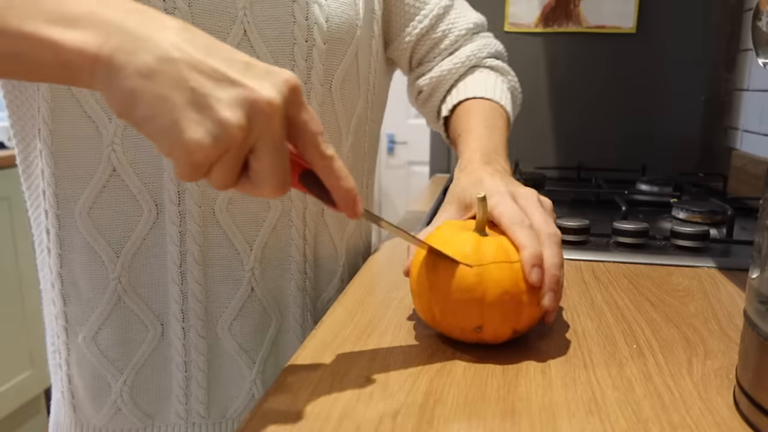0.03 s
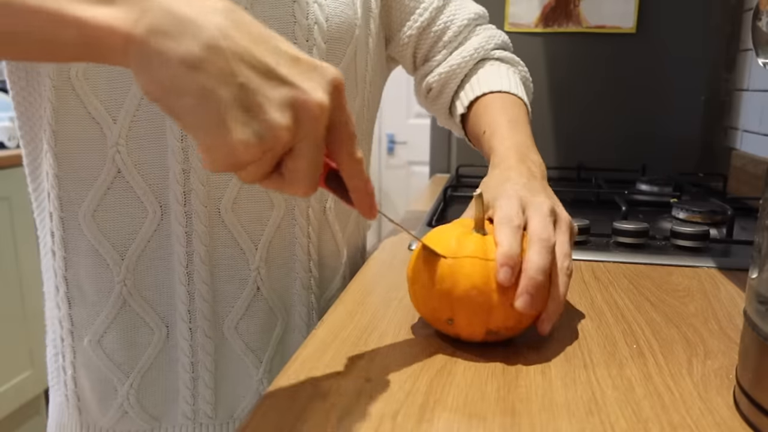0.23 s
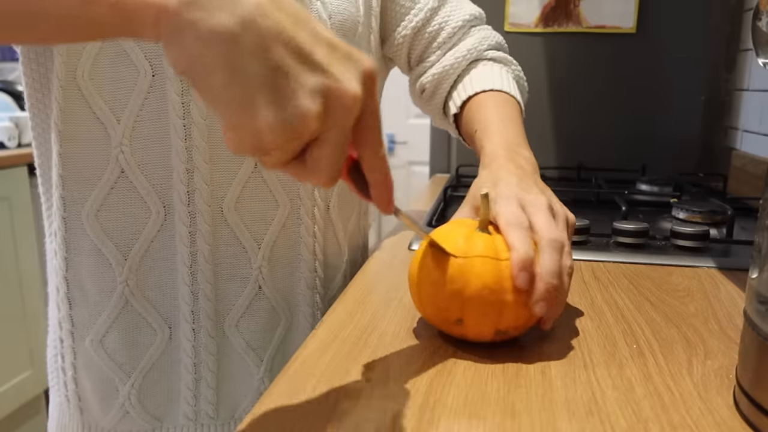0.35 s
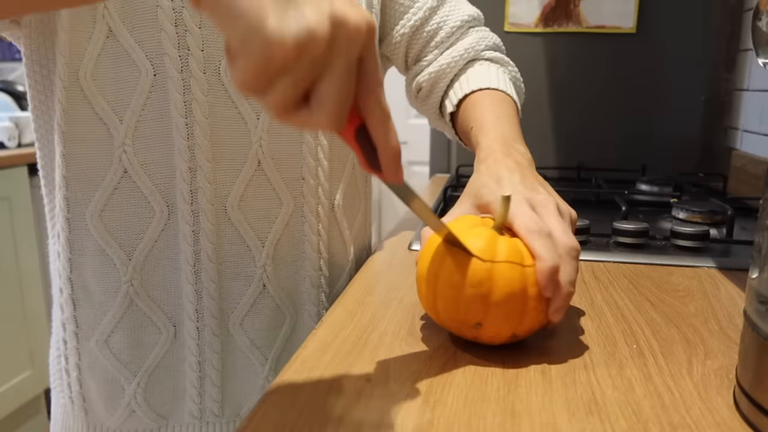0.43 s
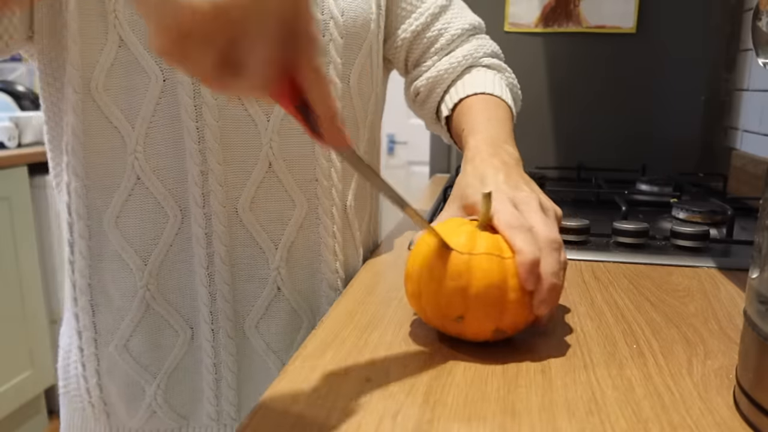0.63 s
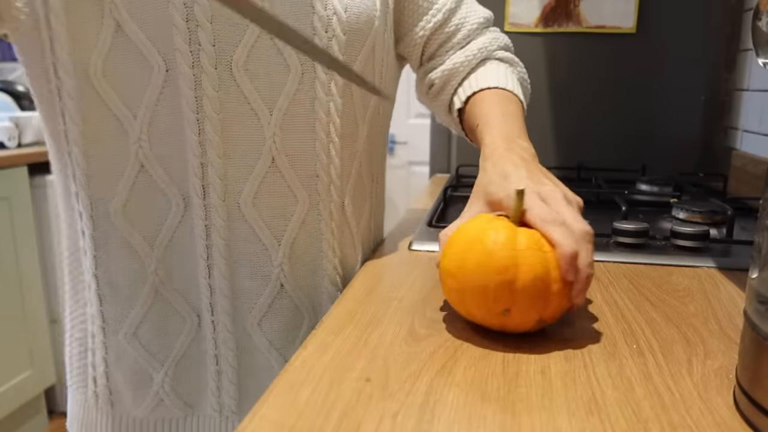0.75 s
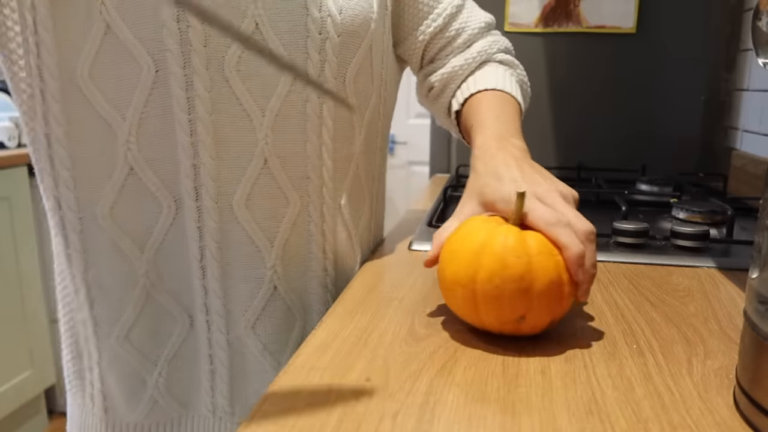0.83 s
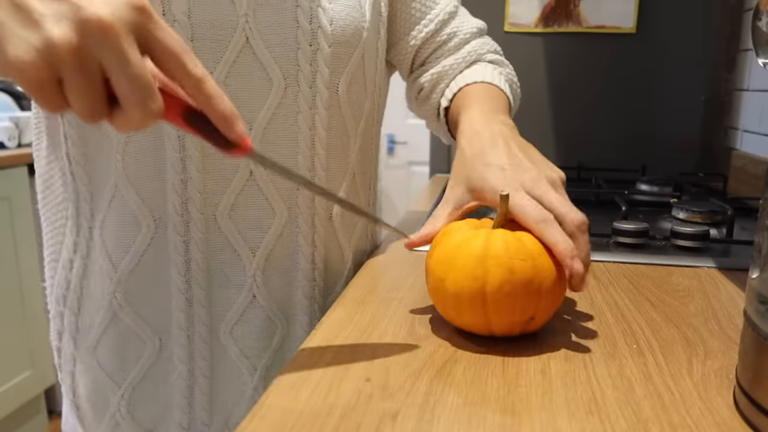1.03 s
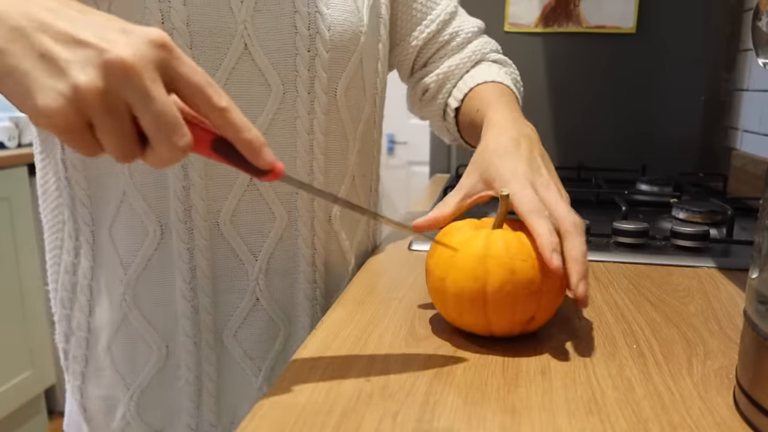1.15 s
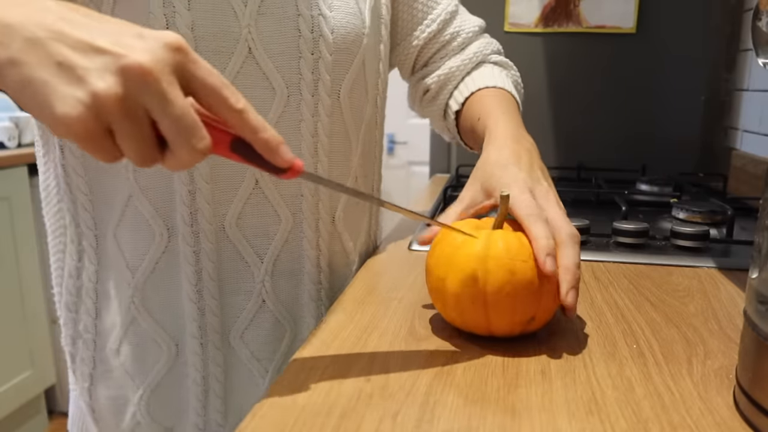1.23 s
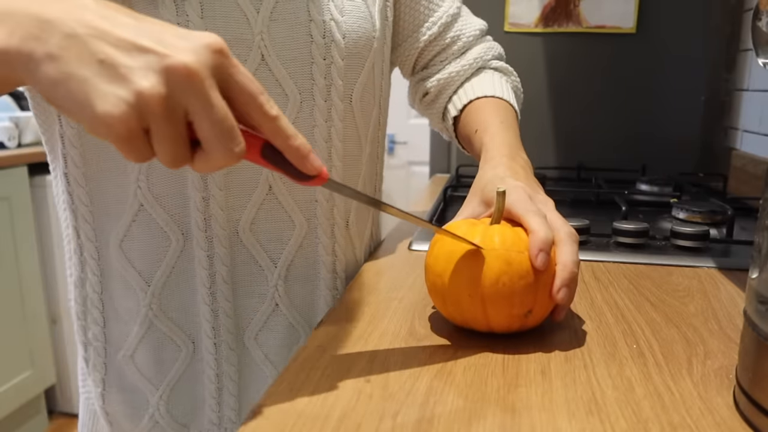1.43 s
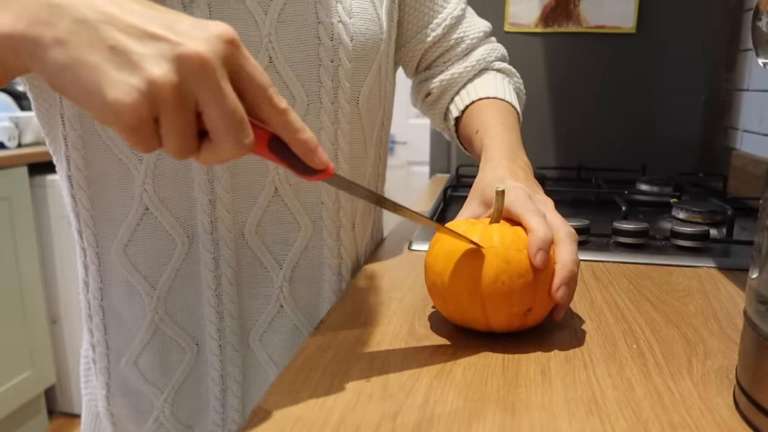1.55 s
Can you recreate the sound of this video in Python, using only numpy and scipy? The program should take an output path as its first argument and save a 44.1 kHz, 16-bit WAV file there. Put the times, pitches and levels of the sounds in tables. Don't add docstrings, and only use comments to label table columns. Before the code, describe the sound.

Knife cutting a small hard pumpkin: short rasp, dull heavy knocks on a worktop, low fridge hum

```python
import sys
import numpy as np
from scipy import signal
from scipy.fft import rfft, irfft, next_fast_len
from scipy.io import wavfile
from scipy.ndimage import map_coordinates

SR = 44100
rng = np.random.default_rng(int(sys.argv[2]) if len(sys.argv) > 2 else 0)


def generate_wav(signal):
    frames = np.transpose(np.atleast_2d(signal))
    scaled = np.clip(frames, -1, 1) * 32767
    pcm = np.round(scaled).astype(np.int16)
    wavfile.write(sys.argv[1], SR, pcm)


def convert_level_to_amplitude(level_db):
    exponent = np.asarray(level_db, float) / 20
    return 10 ** exponent


N = 70560
TIME_S = np.arange(N) / SR
OPPOSITE = np.array([[1], [-1]])


def unit(x):
    return x / np.sqrt(np.mean(x ** 2) + 1e-20)


def along(points, hz):
    f, v = np.transpose(points)
    return np.interp(np.log(hz + 1), np.log(f + 1), v)


def wobble(knots_per_s):
    knots = rng.standard_normal(int(N * knots_per_s / SR) + 4)
    return map_coordinates(knots, [np.arange(N) * knots_per_s / SR])


def filtered(x, response):
    m = next_fast_len(N + SR // 2)
    return irfft(rfft(x, m) * response(np.fft.rfftfreq(m, 1 / SR)), m)[..., :N]


def coloured(x, spectrum):
    low_hz = spectrum[0][0]
    return filtered(x, lambda hz: convert_level_to_amplitude(along(spectrum, hz)) * np.minimum(1, hz / low_hz) ** 4)


def add(track, s, sound):
    part = track[round(s * SR):][:len(sound)]
    part += sound[:len(part)]


def friction(stroke, colour, resonances):
    grains_per_s, spread_db = 2500, 5
    grains = (rng.random(N) < grains_per_s / SR) * convert_level_to_amplitude(spread_db * rng.uniform(-1.9, 1, N))
    grains = grains * np.sign(rng.standard_normal(N))
    rough = np.sqrt(0.5) * (unit(grains) + rng.standard_normal(N))

    def cut(hz):
        ring = 1
        for centre_hz, width_hz, db in resonances:
            damping = 1j * hz * width_hz
            ring = ring + convert_level_to_amplitude(db - 0.5) * damping / (centre_hz ** 2 - hz ** 2 + damping)
        return ring

    s, db = np.transpose(stroke)
    level_db = np.interp(TIME_S, s, db, left=-120, right=-120) + 0.52 * wobble(60)
    return convert_level_to_amplitude(level_db) * unit(coloured(filtered(rough, cut), colour))


def strike(modes, tilt_db, centre_hz, attack_s):
    t = np.arange(SR // 4) / SR
    ring = np.zeros(len(t))
    for hz, db, t60_s in modes:
        level_db = db + tilt_db * np.log2(hz / centre_hz) + rng.standard_normal()
        ring += convert_level_to_amplitude(level_db - 60 * t / t60_s) * np.sin(2 * np.pi * hz * t)
    return ring * (1 - np.exp(-t / attack_s))


def strikes(blows, modes, centre_hz, attack_s):
    out = np.zeros(N)
    for s, db, tilt_db in blows:
        add(out, s, convert_level_to_amplitude(db) * strike(modes, tilt_db, centre_hz, attack_s))
    return out


def cracks(blows, crack_db):
    out, t = np.zeros(N), np.arange(SR // 50) / SR
    for s, db, _ in blows:
        add(out, s, convert_level_to_amplitude(db + crack_db - 60 * t / 0.006) * rng.standard_normal(len(t)))
    return out


def thumps(blows, modes):
    force, t = np.zeros(N), np.arange(SR // 2) / SR
    for s, db, ms in blows:
        push = np.hanning(round(ms * SR / 1000))
        add(force, s, convert_level_to_amplitude(db) * push / push.sum())
    ring = np.zeros(len(t))
    for hz, db, t60_s, polarity in modes:
        ring += np.sign(polarity) * convert_level_to_amplitude(db - 60 * t / t60_s) * np.sin(2 * np.pi * hz * t)
    return signal.fftconvolve(force, ring)[:N]


# (time [s], level [dB])
SAW = [(0, -53.5), (.014, -46.5), (.06, -35.5), (.084, -37.5), (.105, -41), (.132, -52.5), (.17, -51),
       (.19, -78)]
# (frequency [Hz], level [dB])
SAW_COLOUR = [(400, -2), (700, -5.5), (1400, -4), (3000, -5), (5000, -13), (7500, -20.5), (11500, -18.5),
              (14000, -21)]
# (frequency [Hz], width [Hz], level [dB])
CUT = [(447, 32, 9), (684, 35, 6), (1046, 35, 5), (1310, 30, 7.5), (1500, 41, 12.5), (1795, 68, 7.5),
       (2060, 39, 5.5), (2250, 27, 3), (2760, 52, 1), (3056, 39, -0.5)]


def saw():
    return friction(SAW, SAW_COLOUR, CUT)


# (frequency [Hz], rms level [dB])
HUM = [(100, -44), (200, -59), (300, -57), (462, -68)]
# (frequency [Hz], level [dB])
RUMBLE = [(30, -39), (50, -9), (75, -12.5), (100, 0.5), (125, -6), (160, -8.5), (200, -19.5), (260, -27)]


def fridge():
    lines = np.zeros(N)
    for hz, db in HUM:
        level = np.sqrt(2) * convert_level_to_amplitude(db + 1.5 * wobble(14.15))
        drift_rad = 0.25 * wobble(11.65) + rng.uniform(0, 2 * np.pi)
        lines += level * np.sin(2 * np.pi * hz * TIME_S + drift_rad)
    rumble = unit(coloured(rng.standard_normal(N), RUMBLE + [(500, -95)]))
    return lines + convert_level_to_amplitude(-47 + 2.1 * wobble(7.9)) * rumble


# (frequency [Hz], level [dB])
AIR = [(230, -1), (330, -0.5), (520, -7), (1000, -9.5), (3000, -16.5), (6000, -23.5), (11000, -33.5),
       (15500, -36.5)]
# (frequency [Hz], left-right likeness [0-1])
ALIKE = [(200, 0.26), (300, 0.093), (1000, 0.22), (3000, 0.45), (8000, 0.44), (14000, 0.37)]


def air():
    def mid_side(hz):
        turn = np.arccos(np.clip(along(ALIKE, hz), -1, 1)) / 2
        return np.array([np.cos(turn), np.sin(turn)])

    mid, side = filtered(coloured(rng.standard_normal((2, N)), AIR), mid_side)
    return convert_level_to_amplitude(-51 + 0.85 * wobble(4.9)) * unit(np.array([mid + side, mid - side]))


# (time [s], level [dB], frequency [Hz], t60 [s])
SLIPS = [(.0255, -46, 11100, .006), (.0308, -47, 9500, 0.0049), (.0312, -41, 11900, 0.0069),
         (0.045, -32.5, 1500, 0.022), (0.0615, -37, 1500, 0.014), (0.07, -34.5, 1430, 0.016),
         (0.079, -29, 1346, 0.027), (.091, -35, 2170, 0.025), (.187, -42, 1590, 0.013),
         (0.209, -35.5, 1500, .03), (.212, -44, 2270, 0.012), (0.218, -41, 1500, .03),
         (0.2275, -37, 1500, 0.0222), (.249, -39, 1400, .025), (0.265, -41.5, 1500, .025),
         (.281, -42, 1460, .02), (.288, -44, 1550, 0.018), (.297, -46, 1500, 0.021), (.306, -44, 1570, .02),
         (0.701, -44, 1200, 0.013), (0.7026, -36, 1350, 0.019), (.7045, -42, 12900, .012),
         (.707, -41, 1500, 0.013), (.7177, -46, 12500, .007), (0.7184, -37, 1680, 0.023),
         (0.7306, -50, 1400, 0.012), (0.76, -40.5, 1500, 0.021), (0.952, -42, 1770, 0.024),
         (0.968, -42.5, 1790, .02)]


def slips():
    out = np.zeros(N)
    for s, db, hz, t60_s in SLIPS:
        add(out, s, convert_level_to_amplitude(db) * strike([(hz, 0, t60_s)], 0, centre_hz=hz, attack_s=0.0012))
    return out


# (time [s], force [dB], contact [ms])
ROCKS = [
    (.046, -33.5, 2.3),
    (.0775, -25.5, 4.3),
    (.1055, -18, 8.2),
    (.709, -24, 4.2),
    (.744, -32, 5.1),
    (.785, -26.5, 8.6),
    (1.022, -24.5, 9.6),
    (1.06, -28.5, 7.2),
    (1.255, -35.5, 6.9),
]
# (frequency [Hz], level [dB], t60 [s], polarity)
SWAY = [(121.9, 0.5, 0.29, -1), (140, -12, 0.12, -1), (187, -2.5, 0.049, 1)]


def rocking():
    return thumps(ROCKS, SWAY)


# (time [s], level [dB], brightness [dB/octave])
SNAPS = [
    (0.0602, -23.5, 2),
    (.501, -63, 2),
]
# (frequency [Hz], level [dB], t60 [s])
SKIN = [(2800, -2.5, 0.023), (3000, 0.5, 0.013), (3610, -2, .012), (4400, -0.5, 0.009), (5560, -8, .01),
        (8370, -6, 0.007), (10800, -8.5, 0.0082), (11900, -11.5, 0.0079)]


def skin_snaps():
    return strikes(SNAPS, SKIN, centre_hz=4080, attack_s=0.0006) + cracks(SNAPS, -16)


# (time [s], force [dB], contact [ms])
LEANS = [
    (.107, -20, 20),
    (.2, -23, 24),
    (.29, -31, 7.9),
    (.652, -22, 21),
    (.72, -39, 10),
    (.945, -23, 9),
    (1.1, -32, 7.6),
]
# (frequency [Hz], level [dB], t60 [s], polarity)
CABINET = [(51, -12.5, 0.34, 1), (66.4, -9, 0.14, 1)]


def leans():
    return thumps(LEANS, CABINET)


# (time [s], level [dB])
SLIDE = [(.175, -56), (.19, -42), (.21, -42), (.24, -49), (.305, -50.5), (.318, -78)]
# (frequency [Hz], level [dB])
SLIDE_COLOUR = [(250, 10.5), (600, -0.5), (1500, -6), (3000, -8), (5000, -14.5), (14000, -52)]


def slide():
    return friction(SLIDE, SLIDE_COLOUR, [])


# (time [s], level [dB])
TEAR = [(.178, -82), (.186, -67), (.197, -60), (.203, -83)]
# (frequency [Hz], level [dB])
TEAR_COLOUR = [(7000, -24), (9500, -1), (13500, -1), (15000, -13)]


def tear():
    return friction(TEAR, TEAR_COLOUR, [])


# (time [s], force [dB], contact [ms])
EDGE_BLOWS = [
    (.1948, -1, 7.72),
    (.262, -12.5, 7.74),
    (.2865, -13.5, 10.1),
    (.543, -20.5, 10.4),
    (1.462, -20.5, 9.24),
]
# (frequency [Hz], level [dB], t60 [s], polarity)
EDGE = [(80.5, -8, 0.026, 1), (86.5, -21, 0.38, 1), (121.8, -3, 0.21, -1), (147.7, 2.5, 0.095, -1),
        (209.2, 3.5, 0.074, 1), (408, -2.5, 0.05, 1)]
# (time [s], level [dB])
GRIP = [(.31, 0.5), (.33, -3.5), (.5, -27), (0.529, 0.5)]


def edge_landings():
    return thumps(EDGE_BLOWS, EDGE) * convert_level_to_amplitude(np.interp(TIME_S, *np.transpose(GRIP)))


# (time [s], level [dB], brightness [dB/octave])
SLAPS = [
    (0.1951, -30, 0),
    (.262, -43, 0.5),
    (0.71, -43.5, -1.5),
]
# (frequency [Hz], level [dB], t60 [s])
RIND = [(298.6, 9, 0.045), (363, 6.5, 0.048), (454, -15.5, 0.076), (608, -1, 0.066), (769, -5.5, 0.057),
        (1630, 2.5, 0.023), (2100, 1.5, 0.015)]
# (time [s], level [dB], brightness [dB/octave])
FLAT_SLAP = (.9372, -31, -0.57)
# (frequency [Hz], level [dB], t60 [s])
BASE = [(344, 2, 0.062), (477, -6.5, 0.076), (608, -5.5, 0.084), (793, -9, 0.028), (1020, -4, 0.023),
        (1250, -5.5, 0.022), (1593, -7.5, 0.027), (1860, -7, 0.022)]


def rind_slaps():
    crack_hz = 2480
    ring = strikes(SLAPS, RIND, centre_hz=710, attack_s=0.001)
    ring += strikes([FLAT_SLAP], BASE, centre_hz=710, attack_s=0.0004)
    contact = cracks(SLAPS + [FLAT_SLAP], -16.5)
    return ring + filtered(contact, lambda hz: (crack_hz / (crack_hz + 1j * hz)) ** 2)


# (time [s], level [dB])
WIGGLE = [(.47, -85), (.487, -57), (.5, -47), (.52, -53), (.535, -71), (.55, -90)]
# (frequency [Hz], level [dB])
WIGGLE_COLOUR = [(400, -27), (700, 0), (1500, -10.5), (3000, -18.5), (6000, -24), (9500, -19), (14000, -25)]


def wiggle():
    return friction(WIGGLE, WIGGLE_COLOUR, CUT)


# (time [s], force [dB], contact [ms])
MIDDLE_BLOWS = [
    (.656, -19.5, 6.4),
    (.9393, -1.5, 4.23),
    (.994, -17, 6.5),
    (1.135, -30.5, 5.5),
    (1.206, -33, 2.8),
    (1.494, -25, 13),
]
# (frequency [Hz], level [dB], t60 [s], polarity)
MIDDLE = [(81, -7.5, 0.065, 1), (86.5, -9, 0.21, 1), (124.3, 2, 0.053, -1), (161, -12.5, 0.16, -1),
          (209, -14.5, 0.11, 1), (398, -19, 0.25, 1)]


def middle_landings():
    return thumps(MIDDLE_BLOWS, MIDDLE)


# (time [s], level [dB])
PULL_OUT = [(.694, -61), (.702, -57), (.714, -40.5), (.74, -52), (.77, -56), (.82, -64), (.86, -86.5)]
# (frequency [Hz], level [dB])
PULL_COLOUR = [(600, 0), (1500, -6.5), (2500, -5), (3400, -5), (4500, -6.5), (6500, -22.5), (12000, -12.5),
               (15000, -29)]
# (frequency [Hz], width [Hz], level [dB])
FREE_BLADE = [(1730, 86, 9), (3280, 44, 6), (3725, 89, 5.5), (4280, 54, 7), (5200, 140, 1.5)]


def pull_out():
    return friction(PULL_OUT, PULL_COLOUR, FREE_BLADE)


# (time [s], level [dB], brightness [dB/octave])
FLICKS = [
    (.7065, -45, 2),
    (.7106, -23.5, 1),
    (.7175, -43, 5),
]
# (frequency [Hz], level [dB], t60 [s])
BLADE = [(1500, -2, 0.018), (3313, -0.5, .022), (4166, -3.5, 0.017), (5330, -6, 0.015), (7180, -8, 0.0098),
         (8700, -7, .008), (9500, -10, 0.0081), (10400, -10.5, .007), (11700, -11.5, 0.0065),
         (13200, -12.5, .007)]


def blade_flicks():
    return strikes(FLICKS, BLADE, centre_hz=4080, attack_s=0.0015) + cracks(FLICKS, -18)


# (time [s], level [dB])
SETTLE = [(.935, -91), (.942, -63), (.97, -53), (1.04, -56), (1.08, -78)]


def settle():
    return friction(SETTLE, SLIDE_COLOUR, [])


def nearby(x):
    t60_s, low_hz = 0.021, 6100
    t = np.arange(SR // 20) / SR
    echo = convert_level_to_amplitude(-60 * t / t60_s) * rng.standard_normal((2, len(t)))
    bright = filtered(x, lambda hz: 1j * hz / (low_hz + 1j * hz))
    return convert_level_to_amplitude(-4) * signal.fftconvolve(bright[None], echo / np.linalg.norm(echo[0]), axes=1)[:, :N]


# (frequency [Hz], t60 [s])
KITCHEN = [(100, 0.58), (1000, 0.16), (4000, 0.35), (12000, 0.34)]


def kitchen(x):
    hz, t, z = signal.stft(rng.standard_normal((2, SR // 2)), SR, nperseg=256)
    decay = convert_level_to_amplitude(-60 * t / along(KITCHEN, hz)[:, None])
    tail = signal.istft(z * decay, SR, nperseg=256)[1]
    delayed = np.pad(x, (200, 0))
    return signal.fftconvolve(delayed[None], tail / np.linalg.norm(tail[0]), axes=1)[:, :N]


def lag(x, spread_rad):
    return filtered(x, lambda hz: np.exp(1j * spread_rad * (hz / 8000) ** 2 * OPPOSITE))


def scene():
    rasp = saw() + slide() + tear() + wiggle() + pull_out() + settle()
    sharp = slips() + skin_snaps() + rind_slaps() + blade_flicks()
    low = rocking() + leans() + edge_landings() + middle_landings()
    near = sharp + rasp
    ports = lag(sharp, 1) + lag(rasp, 0.36)
    boom, other = kitchen(low)
    wood = (low + convert_level_to_amplitude(-19.5) * boom + fridge()) * convert_level_to_amplitude([[0.2], [-0.2]])
    leak_hz = 140
    leak = convert_level_to_amplitude(-29) * filtered(other, lambda hz: (1j * hz / (leak_hz + 1j * hz)) ** 2) * OPPOSITE
    return wood + leak + ports + nearby(near) + convert_level_to_amplitude(-12) * kitchen(near) + air()


def top_cut(x):
    return signal.sosfilt(signal.butter(12, 15670, fs=SR, output="sos"), x)


def record(dry):
    low_hz, high_hz, top_hz = 45, 14300, 15700

    def mic(hz):
        bass, treble = 1 + (low_hz / (hz + 1)) ** 8, 1 + (hz / high_hz) ** 24
        return (hz < top_hz) / np.sqrt(bass * treble)

    mix = filtered(dry, mic)
    return top_cut(mix)


dry = scene()
out = record(dry)
generate_wav(out)
```